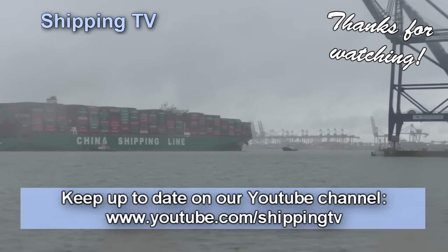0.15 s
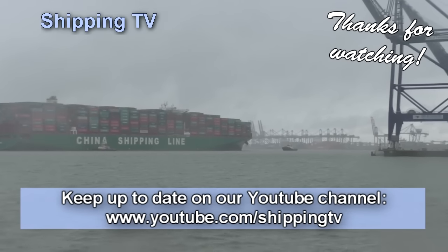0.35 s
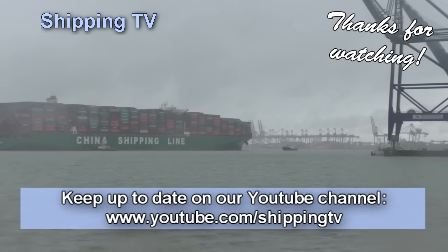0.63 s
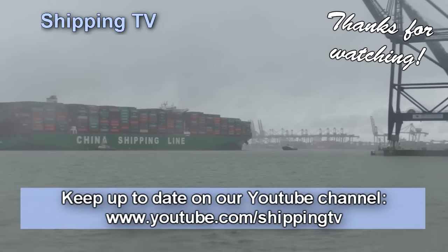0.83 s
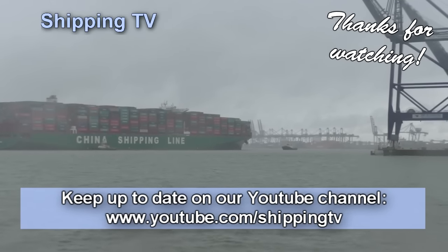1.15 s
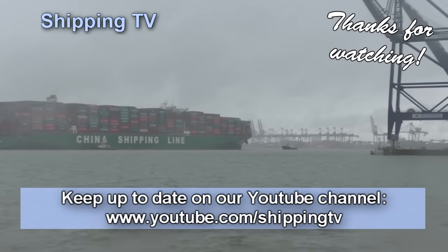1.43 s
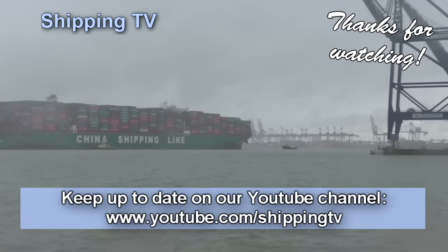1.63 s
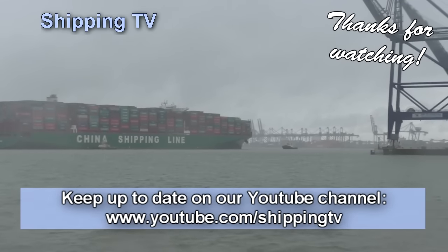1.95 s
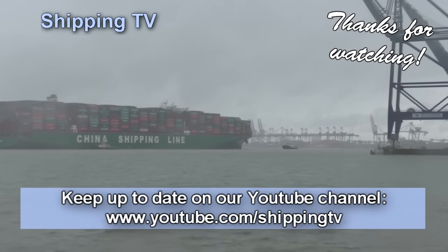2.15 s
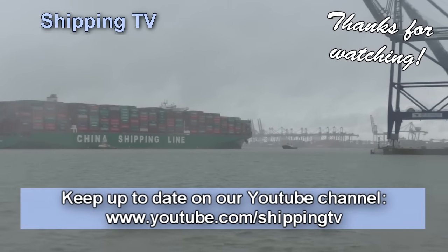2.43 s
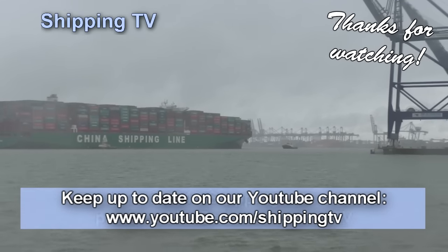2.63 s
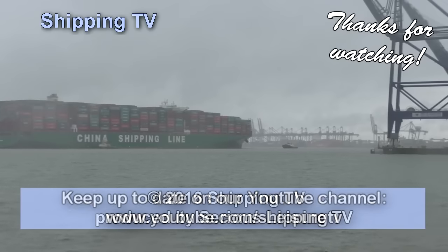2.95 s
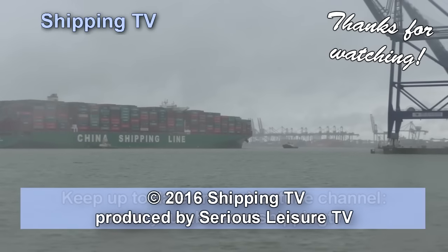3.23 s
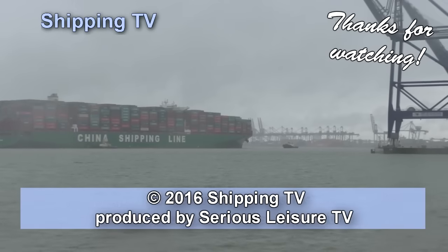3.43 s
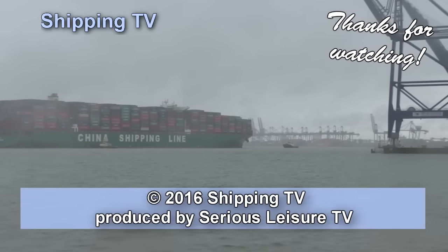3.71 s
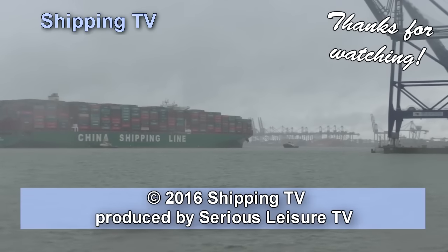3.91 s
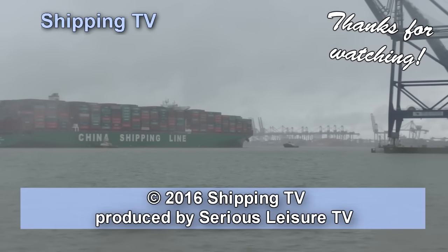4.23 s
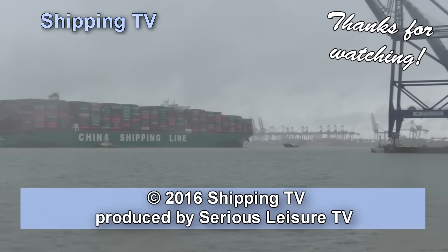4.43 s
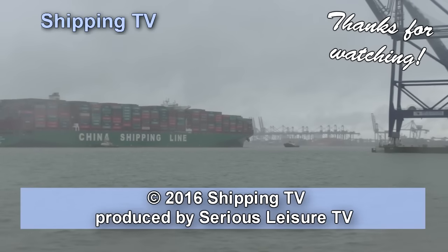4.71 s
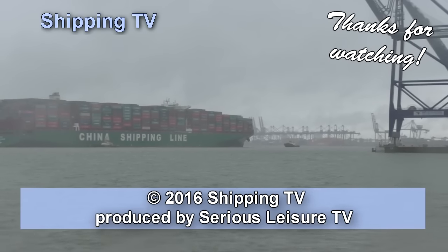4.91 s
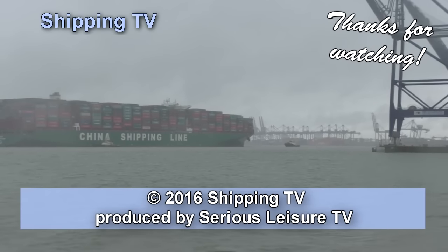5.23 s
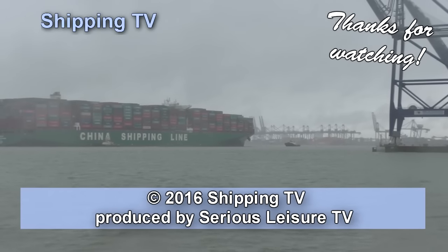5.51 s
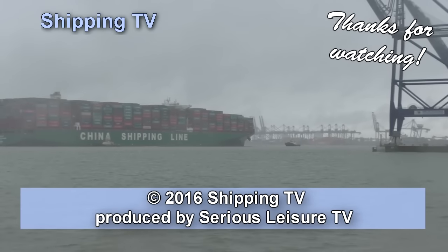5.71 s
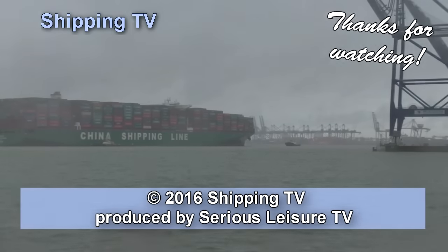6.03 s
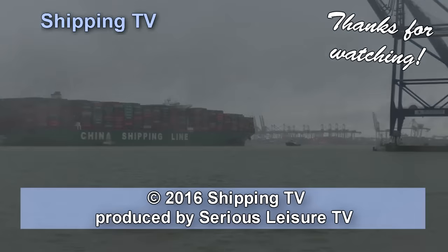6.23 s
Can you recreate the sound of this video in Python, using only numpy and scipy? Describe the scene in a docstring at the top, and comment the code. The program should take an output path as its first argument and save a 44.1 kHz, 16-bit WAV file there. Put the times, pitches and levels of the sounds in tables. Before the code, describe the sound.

Steady rain patters over open waterside as blustery wind thumps, flutters and rasps against the microphone, with sharp drops ticking on its housing.

```python
"""Rain hisses all round and gusty wind rumbles and flutters on a two-port microphone at a harbour quay.
The microphone stands in the weather: eddies thump and rasp on it and large drops tick on its housing.
Wind is shaped noise driven by gusts; rain is random close ticks over a wash of distant drops.
A limiter lets hard gusts duck the rain; the hardest overload the microphone."""
import sys
import numpy as np
from scipy import signal
from scipy.fft import rfft, irfft, next_fast_len
from scipy.io import wavfile
from scipy.ndimage import uniform_filter1d

SR = 44100
rng = np.random.default_rng(int(sys.argv[2]) if len(sys.argv) > 2 else 0)


def wav_out(sig):
    """Save sig, one row per channel (or a flat mono array), as 16-bit PCM at SR to the path in sys.argv[1]."""
    wavfile.write(sys.argv[1], SR, np.round(np.clip(np.atleast_2d(sig).T, -1, 1) * 32767).astype(np.int16))


N = 280740
SIZE = next_fast_len(N, True)
TIME, HZ = np.arange(N) / SR, np.fft.rfftfreq(SIZE, 1 / SR)
OPPOSED = np.array([[1], [-1]])  # left up, right down

# Source levels below stand before the layer trims and the microphone chain.
# Low rumble below the wind, rising and falling as the recorder's gain changes: (time [s], level [dB])
LOW_RUMBLE_LEVEL = [(0.06, -66), (1.94, -80), (2.0, -71), (2.2, -83.5), (2.63, -60), (3.8, -88),
                    (5.88, -85), (6.3, -95)]
# Level of the rain as heard, with dips under hard gusts: (time [s], level [dB])
RAIN_LEVEL = [(0.02, -59.5), (0.15, -57.5), (0.3, -57.5), (0.4, -60), (0.52, -58), (1.1, -61.5),
              (1.45, -61), (1.6, -58), (1.76, -59.5), (2.05, -56.5), (2.45, -55), (2.75, -55.5),
              (3.03, -60.5), (3.22, -59.5), (3.36, -62), (3.53, -56.5), (3.75, -61), (3.87, -61.5),
              (4.3, -59.5), (4.47, -57), (4.6, -60), (4.82, -57.5), (5.13, -57.5), (5.35, -60.5),
              (5.5, -57.5), (6.0, -63.5), (6.32, -59)]
# Rain in sheets: (time [s], roar level [dB], high hiss level [dB])
DOWNPOUR_LEVEL = [(0.02, -77, -65.5), (0.3, -60, -59), (0.6, -73, -63.5), (1.1, -73, -67.5),
                  (1.78, -63, -67), (1.93, -59, -56), (2.05, -52.5, -55.5), (2.2, -54, -54.5),
                  (2.45, -58, -54.5), (2.65, -58, -58.5), (2.92, -64, -62), (3.1, -72, -66.5),
                  (4.4, -72, -68), (5.15, -65, -62.5), (5.4, -67, -66), (6.0, -67.5, -68)]
# Large drops on the housing: (time [s], knock level [dB], splat level [dB])
HOUSING_DROPS = [(0.398, -55, -54), (0.489, -57, -53), (0.4923, -57, -52), (0.5756, -53, -58),
                 (0.5938, -55, -54), (0.6465, -55, -55), (0.7682, -58, -56), (0.852, -55, -56),
                 (1.0288, -56, -57), (1.2073, -55, -54.5), (1.352, -51.5, -56), (1.4552, -57, -54),
                 (1.5375, -52, -58), (1.648, -45, -61), (1.8277, -53, -53), (1.8306, -57, -53.5),
                 (1.9387, -56, -51), (2.7244, -48.5, -48), (2.7795, -59, -55), (2.916, -49, -51),
                 (2.9838, -56, -54), (3.1235, -66, -56.5), (3.2005, -50.5, -52), (3.2324, -53, -61),
                 (3.2925, -51, -54), (3.5172, -67, -51.5), (3.765, -59, -50.5), (3.792, -59, -58),
                 (3.9798, -56, -53), (4.1658, -54, -72), (4.4208, -52.5, -60), (4.455, -52, -57),
                 (4.5588, -61, -56), (4.653, -52, -55), (4.7561, -64, -57), (4.8175, -51, -53),
                 (5.073, -53, -51), (5.1232, -51, -50), (5.212, -59, -53), (5.2857, -58, -51.5),
                 (6.3077, -57, -52)]
# Breeze between the gusts: (time [s], rumble level [dB])
BREEZE_LEVEL = [(0.05, -41), (0.63, -43), (0.8, -43), (0.87, -48.5), (0.94, -38), (1.3, -42.5), (1.48, -45),
                (1.54, -42), (1.6, -44.5), (1.72, -45.5), (1.87, -49.5), (2.3, -44.5), (2.8, -50),
                (3.22, -47), (3.92, -39.5), (4.35, -39.5), (4.61, -51), (4.8, -40.5), (5.03, -48),
                (5.3, -40.5), (5.62, -41), (5.71, -43.5), (5.8, -41), (6.09, -45), (6.31, -48.5)]
# Gusts striking the microphone:
# (start [s], length [s], rumble level [dB], flutter level [dB], sideways swirl level [dB])
GUST_EVENTS = [(0.125, 0.033, -39.5, -64, -54), (0.204, 0.027, -36, -65, -53),
               (0.287, 0.058, -32.5, -57, -53), (0.36, 0.046, -33.5, -47.5, -52),
               (0.433, 0.07, -35, -49, -57), (0.521, 0.034, -32, -44.5, -55),
               (0.587, 0.028, -39.5, -69, -69), (0.671, 0.0087, -30.5, -62, -61),
               (0.705, 0.098, -35.5, -69, -64), (0.959, 0.078, -36, -52, -52),
               (1.019, 0.093, -39, -47.5, -49.5), (1.132, 0.065, -35, -51.5, -59),
               (1.232, 0.018, -32, -55, -65), (1.28, 0.047, -52, -60, -58), (1.388, 0.084, -35, -72, -60),
               (1.606, 0.034, -32.5, -65, -55), (1.986, 0.017, -37.5, -70, -62),
               (2.054, 0.12, -41.5, -57, -59), (2.288, 0.1, -46, -65, -64), (2.436, 0.03, -36, -60, -65),
               (2.548, 0.055, -38, -54, -55), (2.613, 0.071, -34, -51, -59), (2.691, 0.16, -36.5, -51, -58),
               (2.832, 0.051, -38, -55, -55), (2.901, 0.077, -32.5, -48, -55),
               (2.987, 0.054, -33.5, -53, -63), (3.06, 0.14, -33, -52, -54),
               (3.216, 0.032, -34.5, -54, -56), (3.27, 0.015, -29, -61, -58), (3.305, 0.013, -36, -47, -51),
               (3.358, 0.006, -29.5, -51, -60), (3.413, 0.078, -33.5, -48, -54),
               (3.543, 0.046, -37, -54, -52), (3.602, 0.022, -35, -53, -57), (3.69, 0.069, -36, -50, -52),
               (3.792, 0.032, -36.5, -47.5, -50), (3.842, 0.046, -49, -47, -48),
               (3.964, 0.025, -39, -52, -55), (4.02, 0.11, -38.5, -52, -59), (4.155, 0.012, -30, -49, -60),
               (4.186, 0.035, -35.5, -56, -54), (4.242, 0.065, -33.5, -47.5, -52),
               (4.397, 0.014, -31, -47.5, -55), (4.459, 0.13, -37, -56.5, -52),
               (4.634, 0.0069, -36, -60, -56), (4.665, 0.019, -33.5, -54, -64),
               (4.708, 0.016, -30.5, -49, -59), (4.762, 0.033, -38, -52, -67),
               (4.868, 0.043, -35.5, -48.5, -55), (4.938, 0.061, -34, -52, -54),
               (5.055, 0.058, -37.5, -49, -54), (5.137, 0.064, -36.5, -49, -52),
               (5.208, 0.042, -33.5, -50, -60), (5.338, 0.042, -33, -48, -66),
               (5.408, 0.14, -38.5, -63, -60), (5.526, 0.068, -34, -50.5, -54),
               (5.64, 0.042, -36, -53, -53), (5.738, 0.061, -35, -50.5, -51),
               (5.802, 0.06, -39.5, -46, -50), (5.923, 0.033, -33.5, -53, -57),
               (5.994, 0.053, -37.5, -60, -68), (6.092, 0.036, -35, -61, -66),
               (6.134, 0.076, -36, -51, -54), (6.223, 0.054, -37.5, -49.5, -48.5),
               (6.348, 0.018, -34, -45.5, -48)]
# Strongest eddies hitting the microphone: (time [s], thump level [dB], rasp level [dB])
EDDY_HITS = [(0.299, -37.5, -57), (0.318, -52, -56), (0.388, -40, -57), (0.400, -47, -57),
             (0.495, -46, -57), (0.674, -43, -52), (0.705, -45, -54), (0.712, -37.5, -47),
             (0.733, -43, -52), (0.759, -45, -53), (0.960, -58, -46), (0.988, -37.5, -46),
             (1.015, -38.5, -52), (1.050, -52, -54), (1.082, -56, -60), (1.099, -51, -59),
             (1.129, -48, -52), (1.156, -45, -62), (1.239, -45.5, -52), (1.25, -49, -49),
             (1.424, -40.5, -52), (1.624, -47.5, -51), (2.904, -41.5, -65), (2.928, -37, -47),
             (2.991, -42, -63), (3.073, -35.5, -43), (3.103, -47, -54), (3.118, -50, -60), (3.16, -34, -56),
             (3.176, -45, -54), (3.279, -40.5, -53), (3.326, -27, -38), (3.362, -43, -50),
             (3.404, -40, -62), (3.425, -46, -55), (3.502, -38, -45), (3.729, -49, -53), (3.749, -40, -54),
             (3.798, -40, -60), (3.967, -45.5, -52), (4.062, -42, -45), (4.168, -49, -62),
             (4.278, -44, -50), (4.462, -40, -49), (4.488, -38.5, -61), (4.508, -35, -47),
             (4.528, -43, -61), (4.561, -43.5, -52), (4.726, -52, -66), (4.897, -47, -50.5),
             (4.966, -46, -52), (5.076, -37, -57), (5.223, -45, -59), (5.238, -35.5, -50),
             (5.313, -42, -63), (5.351, -34.5, -57), (5.386, -42.5, -51), (5.553, -41, -62),
             (5.586, -41.5, -56), (5.650, -47, -55), (5.669, -40.5, -53), (5.760, -49, -53),
             (5.773, -35, -62), (5.887, -34, -48), (5.928, -43, -57), (5.952, -45, -53), (6.041, -35, -48),
             (6.067, -50, -51), (6.261, -51, -50)]

# Low rumble below the wind: (frequency [Hz], gain [dB])
LOW_RUMBLE_COLOUR = [(20, -30), (45, -10), (70, -11), (100, 5), (140, 10), (250, -41), (600, -80)]
# Low patter of near drops and their wash: (frequency [Hz], gain [dB])
PATTER_COLOUR = [(150, -34), (400, 9.5), (800, 6), (1500, 5), (2500, -0.5), (4000, -11.5), (5500, -14),
                 (7500, -21.5), (12000, -39)]
# Bright fizz of the same rain: (frequency [Hz], gain [dB])
FIZZ_COLOUR = [(1500, -4.5), (4000, -3), (6500, -7), (8000, -7), (10000, -2.5), (11500, -7), (13500, -11),
               (15800, -13)]
# Roar of a sheet of rain: (frequency [Hz], gain [dB])
ROAR_COLOUR = [(500, -37), (900, -7), (1500, -1.5), (2300, -1.5), (3800, 1), (4700, 0), (5700, -2.5),
               (7000, -23), (10000, -29)]
# High hiss of a sheet of rain: (frequency [Hz], gain [dB])
HISS_COLOUR = [(4000, -46), (6000, -7.5), (8000, -2.5), (10000, -1), (12000, -4.5), (13500, -9),
               (16000, -28)]
# Splat of a large drop: (frequency [Hz], gain [dB])
SPLAT_COLOUR = [(1000, -25), (3000, -4), (4500, -4.5), (7000, -6), (10000, -4), (13000, -17), (16000, -28)]
# Wind rumble: (frequency [Hz], gain [dB])
RUMBLE_COLOUR = [(29, -72), (50, -51), (127, -13), (189, -0.5), (236, -1), (318, -5.5), (433, -16.5),
                 (500, -27), (650, -57), (1100, -120)]
# Brighter wind flutter: (frequency [Hz], gain [dB])
FLUTTER_COLOUR = [(150, -39), (300, -26), (450, -1.5), (680, 4.5), (900, -5.5), (1400, -15), (2500, -36),
                  (5000, -92)]
# Swirls between the ports: (frequency [Hz], gain [dB])
SWIRL_COLOUR = [(40, -40), (120, -53), (200, -39), (300, 6), (400, 8), (700, 5), (1100, -0.5), (2000, -16),
                (5000, -85)]
# Crackle inside the gusts: (frequency [Hz], gain [dB])
CRACKLE_COLOUR = [(200, -26), (450, 2.5), (700, 1), (1100, -5), (1700, -12.5), (3000, -26), (6000, -55)]
# Thump of an eddy: (frequency [Hz], gain [dB])
THUMP_COLOUR = [(60, -55), (110, -43), (180, 4), (260, -7.5), (470, 12), (700, 2), (1200, -17), (2500, -28),
                (6000, -74)]
# Torn air on an eddy: (frequency [Hz], gain [dB])
RASP_COLOUR = [(400, -24), (800, 9), (1150, 3), (1600, -3.5), (2200, -8), (3200, -25), (6000, -48)]

# Stereo width given to the rain: (frequency [Hz], gain of the side part [dB])
RAIN_WIDTH = [(400, -8), (1200, -5), (2500, -7.5), (4600, -9.5), (6300, -22), (15000, -24)]
# Tilt between the channels: (frequency [Hz], left minus right [dB])
STEREO_LEAN = [(700, 0), (1300, 1.9), (2400, 4), (4200, 1.8), (5800, 0)]
# Comb colouring of the mid channel, a filtered copy about 3 ms later:
# (frequency [Hz], strength [0-1], phase lead [rad])
MID_COMB = [(252, 0.38, -3), (635, 0.36, 0.12), (1160, 0.38, 0.97), (1980, 0.5, 1.47), (4120, 0.65, 1.7),
            (7240, 0.7, 1.5), (9900, 0, -3.5), (12000, 0, 10), (14900, .25, 6)]

USUAL_RAIN_DB, USUAL_WIND_DB = -59, -42  # reference levels for rain density and breeze brightness
ATTACK_S, RELEASE_S, ARCH_DB = 0.0083, 0.009, 2  # gust rise, fall, and drop from its middle to its ends
WAKE_S = 0.005  # spread of the stirred air before and after an eddy
KNOCK_HZ, KNOCK_S, KNOCK_SCATTER = 2100, 0.0003, 0.14  # median pitch, decay, log-pitch spread
SPLAT_S, DROP_PAN_DB = 0.0005, 1.5  # decay; largest offset of either channel
CEILING_DB, OVERLOAD_DB = -20.5, -23.8  # limiter threshold; bound of the microphone's soft overload
COMB_S, EDGE_HZ = 0.002948, 15750  # delay of the copy before its phase lead; upper band edge


def amp(db):
    """Decibels to gain."""
    return 10 ** (np.asarray(db) / 20)


def unit(x):
    """Scales to rms 1."""
    return x / np.sqrt(np.mean(x ** 2) + 1e-20)


def across(table, hz, order=1):
    """Reads one column of a table on a log-frequency axis."""
    columns = np.transpose(table)
    return np.interp(np.log(hz + 1), np.log(columns[0] + 1), columns[order])


def along(table, order=1):
    """Reads one column of a curve at every sample."""
    columns = np.transpose(table)
    return np.interp(TIME, columns[0], columns[order])


def add(mix, s, sound):
    """Mixes a two-channel sound in at time s."""
    part = mix[:, max(round(s * SR), 0):][:, :sound.shape[1]]
    part += sound[:, :part.shape[1]]


def together(*gains):
    """Gains of unrelated sounds add in power."""
    return np.sqrt(sum(gain ** 2 for gain in gains))


def wander(rate_hz):
    """Random drift of rms 1, from 2 Hz up, fading steeply above the given rate."""
    shape = (HZ > 2) / (1 + (HZ / rate_hz) ** 4)
    return unit(irfft(rfft(rng.standard_normal(SIZE)) * shape, SIZE)[:N])


def tint(x, spectrum):
    """Filters a sound by a table of (frequency [Hz], gain [dB])."""
    length = x.shape[-1]
    size = next_fast_len(length, True)
    gain = amp(across(spectrum, np.fft.rfftfreq(size, 1 / SR)))
    return irfft(rfft(x, size) * gain, size)[..., :length]


def held(x, size):
    """Evens out the slow chance swells of a noise over size samples, to about rms 1."""
    return x / np.sqrt(uniform_filter1d(x ** 2, size) + 1e-9 * np.mean(x ** 2))


def low_rumble(level_db=15):
    """Low noise, the same in both channels, that rises and falls as the recorder's gain changes."""
    return unit(tint(rng.standard_normal(N), LOW_RUMBLE_COLOUR)) * amp(along(LOW_RUMBLE_LEVEL) + level_db)


def splashes(per_s, spread_db, ring_db, count=12):
    """Random drop impacts, mostly tiny; each patch of wet surface favours its own broad band."""
    out = np.zeros((2, len(HZ)), complex)
    for centre in np.geomspace(1500, 11000, count):
        heft = np.minimum(rng.exponential(1, SIZE), 3.5)
        struck = rng.random(SIZE) < per_s / count / SR
        ticks = struck * amp(spread_db * heft) * rng.choice([-1, 1], (2, SIZE))
        out += rfft(ticks) * amp(ring_db * np.exp(-2 * np.log2((HZ + 1) / centre) ** 2))
    return unit(irfft(out, SIZE)[:, :N])


def rain(patter_db=-2.5, fizz_db=-0.66, roar_db=0.2, hiss_db=0, patter_wash_db=-4, fizz_wash_db=-4.0,
         merging=0.2, flurry_db=1.66, flurry_hz=100):
    """Near drops crackle over the wash of far ones; louder rain merges into a smoother hiss."""
    near = splashes(per_s=3200, spread_db=6.0, ring_db=11)
    level = along(RAIN_LEVEL)
    crowd = amp(merging * (level - USUAL_RAIN_DB))

    def layer(colour, wash_db):
        """Drops and wash in one colour, at even loudness, given stereo width."""
        wash = crowd * amp(wash_db)
        blend = (near + wash * rng.standard_normal((2, N))) / np.sqrt(1 + wash ** 2)
        mid, side = unit(tint(blend, colour))
        return held(mid, size=6000) + OPPOSED * tint(side, RAIN_WIDTH)

    patter = layer(PATTER_COLOUR, patter_wash_db) * amp(level + patter_db)
    fizz = layer(FIZZ_COLOUR, fizz_wash_db) * amp(level + fizz_db)
    # sheets of heavy rain add a wide roar, and a high hiss in mono
    mid, side = unit(tint(rng.standard_normal((2, N)), ROAR_COLOUR))
    roar = (mid + OPPOSED * tint(side, RAIN_WIDTH)) * amp(roar_db + along(DOWNPOUR_LEVEL))
    hiss = unit(tint(rng.standard_normal(N), HISS_COLOUR)) * amp(hiss_db + along(DOWNPOUR_LEVEL, order=2))
    # quick random flurries are shallower when the rain is louder
    flurry = amp(flurry_db * wander(flurry_hz) / (0.5 + 0.5 * crowd ** 2))
    return (patter + fizz + roar + hiss) * flurry


def drops(knock_db=0, splat_db=0, droplet_db=-8, droplet_s=0.0046, count=3):
    """A large drop splats on the housing, which knocks; a few droplets land just after."""
    out, t = np.zeros((2, N)), np.arange(2048) / SR
    packed = np.sqrt(0.005 * SR / len(t))  # refers levels to five milliseconds
    for s, low_db, high_db in HOUSING_DROPS:
        pitch_hz = KNOCK_HZ * np.exp(KNOCK_SCATTER * rng.standard_normal())
        knock = np.sin(2 * np.pi * pitch_hz * t) * np.exp(-t / KNOCK_S)
        burst = rng.standard_normal(len(t)) * np.exp(-t / SPLAT_S)
        splat = tint(np.pad(burst, (0, len(t))), SPLAT_COLOUR)[:len(t)]
        tick = packed * (amp(low_db + knock_db) * unit(knock) + amp(high_db + splat_db) * unit(splat))
        place = amp(DROP_PAN_DB * rng.uniform(-1, 1) * OPPOSED)
        add(out, s, place * tick)
        for delay, size in zip(rng.exponential(1, count), rng.uniform(-1.1, 1, count)):
            add(out, s + droplet_s * delay, place * size * amp(droplet_db) * tick)
    return out


def blowing(order):
    """Gain of all gusts over time, for one level column: attack, arched hold, release."""
    gain = np.zeros(N)
    for row in GUST_EVENTS:
        t, length = TIME - row[0], row[1]
        near = (t > -0.2) & (t < length + 0.3)
        t = t[near]
        shape = np.exp(np.minimum(t, 0) / ATTACK_S - np.maximum(t - length, 0) / RELEASE_S)
        arch_db = -ARCH_DB * (2 * np.clip(t / length, 0, 1) - 1) ** 2
        gain[near] = np.maximum(gain[near], shape * amp(row[order] + arch_db))
    return gain


def wakes():
    """Gain of the short swell of rough air around every eddy."""
    gain = np.zeros(N)
    for s, db, _ in EDDY_HITS:
        near = abs(TIME - s) < 0.1
        gain[near] += amp(db) * np.exp(-0.5 * ((TIME[near] - s) / WAKE_S) ** 2)
    return gain


def wind(gust_db=-1.15, breeze_db=-1, flutter_db=-3.5, calm_flutter_db=-60, brightening=1.0, swirl_db=0.5,
         calm_swirl_db=-60, rumble_lump_db=2.16, flutter_lump_db=3, swirl_lump_db=3, lump_hz=55,
         puff_db=2.5, puff_hz=12, wake_db=5.0, wake_flutter_db=-10, unlike_db=-36):
    """Turbulence at the ports: each lump of air makes it louder, and brighter still."""
    lumps = wander(lump_hz)

    def turbulence(colour, lump_db, size):
        """Lumpy noise in one colour."""
        return held(tint(rng.standard_normal(N) * amp(lump_db * lumps), colour), size=size)

    # the breeze comes in small puffs; a stronger one flutters and swirls more
    breeze = along(BREEZE_LEVEL) + puff_db * wander(puff_hz)
    stir_db = brightening * (breeze - USUAL_WIND_DB)
    wake = wakes()
    force = together(amp(breeze + breeze_db), amp(gust_db) * blowing(order=2), amp(wake_db) * wake)
    rumble = turbulence(RUMBLE_COLOUR, rumble_lump_db, size=1100) * force
    rush = together(amp(calm_flutter_db + stir_db), amp(flutter_db) * blowing(order=3),
                    amp(wake_flutter_db) * wake)
    flutter = turbulence(FLUTTER_COLOUR, flutter_lump_db, size=1500) * rush
    # swirls smaller than the gap between the ports push them in opposite ways
    spin = together(amp(calm_swirl_db + stir_db), amp(swirl_db) * blowing(order=4))
    swirl = turbulence(SWIRL_COLOUR, swirl_lump_db, size=3500) * spin
    # a small part of the rumble also differs between the ports
    unlike = turbulence(RUMBLE_COLOUR, rumble_lump_db, size=2200) * force * amp(unlike_db)
    return rumble + flutter + OPPOSED * (swirl + unlike)


def crackle(level_db=-5, per_s=130, spread_db=3):
    """Tiny eddies break off inside the gusts, so the flutter crackles."""
    heft = np.minimum(rng.exponential(1, N), 2.5)
    shoves = (rng.random(N) < per_s / SR) * rng.choice([-1, 1], N) * amp(spread_db * heft)
    return unit(tint(shoves, CRACKLE_COLOUR)) * amp(level_db) * blowing(order=3)


def eddies(level_db=1.0, rasp_db=-0.5, width_s=0.0022, churn=0.095, rasp_width_s=0.0027, thump_s=0.0082):
    """Each eddy is one shove inside a few milliseconds of churning air, with a rasp of torn air on top."""
    out, t = np.zeros((2, N)), np.arange(-1024, 1024) / SR
    packed = np.sqrt(thump_s * SR / len(t))  # refers levels to the length of the thump
    for s, db, edge_db in EDDY_HITS:
        shove = churn * rng.standard_normal(len(t)) * np.exp(-0.5 * (t / width_s) ** 2)
        shove[len(t) // 2] += np.sign(rng.standard_normal())
        torn = rng.standard_normal(len(t)) * np.exp(-0.5 * (t / rasp_width_s) ** 2)
        thump = amp(db + level_db) * unit(tint(shove, THUMP_COLOUR))
        rasp = amp(edge_db + rasp_db) * unit(tint(torn, RASP_COLOUR))
        add(out, s + t[0], packed * (thump + rasp)[None])
    return out


def scene():
    """Low rumble, rain all round, drops on the housing, and wind at the microphone."""
    return low_rumble() + rain() + drops() + wind() + crackle() + eddies()


def limit(x, recover_db_per_s=280):
    """Pulls the gain down on a peak and lets it back steadily, so hard gusts duck the rain."""
    over_db = np.maximum(20 * np.log10(abs(x).max(0) + 1e-9) - CEILING_DB, 0)
    fall = TIME * recover_db_per_s
    cut_db = np.maximum.accumulate(over_db + fall) - fall
    return x / amp(uniform_filter1d(cut_db, size=64))


def overload(x):
    """Rounds off the tallest waves: hard gusts rasp and chop the rain."""
    return x / (1 + (x / amp(OVERLOAD_DB)) ** 4) ** (1 / 4)


def hollow(x):
    """Leans the mid treble left; a filtered, delayed copy combs the mid channel and hollows the hiss."""
    left, right = rfft(x, SIZE) * amp(across(STEREO_LEAN, HZ) * OPPOSED / 2)
    strength = np.clip(across(MID_COMB, HZ), 0, 1)
    phase = across(MID_COMB, HZ, order=2) - 2 * np.pi * HZ * COMB_S
    delayed = strength * np.exp(1j * phase)
    mid = (left + right) / 2 * (1 + delayed) / np.sqrt(1 + strength ** 2)
    side = (left - right) / 2
    return irfft(np.array([mid + side, mid - side]), SIZE)[:, :N]


def record(dry, low_cut_hz=60):
    """Limiter, overload, stereo lean and mid comb, low cut and band limit, in that order."""
    coloured = hollow(overload(limit(dry)))
    low_cut = 1 - 1 / (1 + (HZ / low_cut_hz) ** 2)
    trimmed = irfft(rfft(coloured, SIZE) * low_cut, SIZE)[:, :N]
    edge = signal.firwin(511, EDGE_HZ, window=("kaiser", 9), fs=SR)
    return signal.oaconvolve(trimmed, edge[None], "same")


dry = scene()
out = record(dry)
wav_out(out)
```